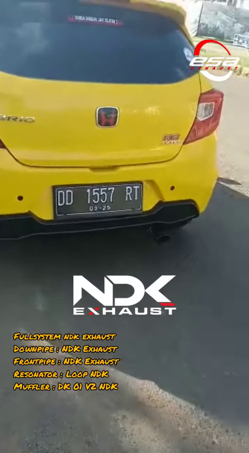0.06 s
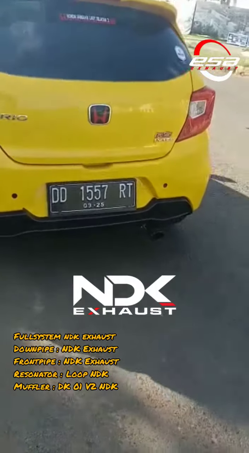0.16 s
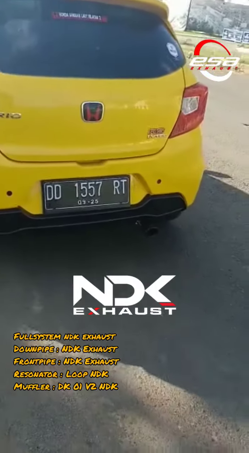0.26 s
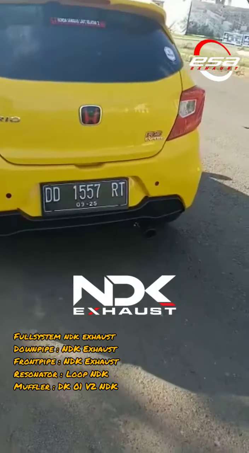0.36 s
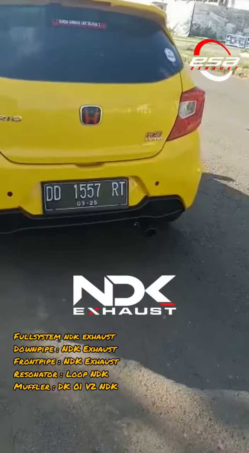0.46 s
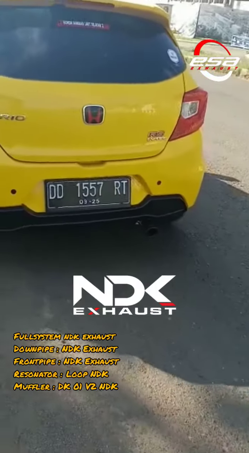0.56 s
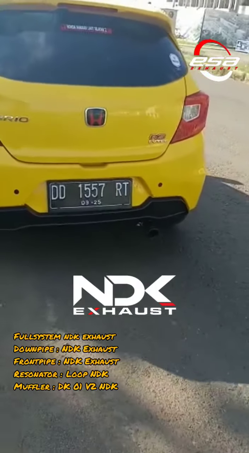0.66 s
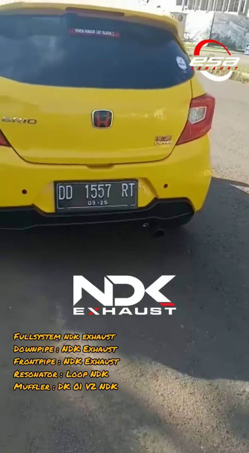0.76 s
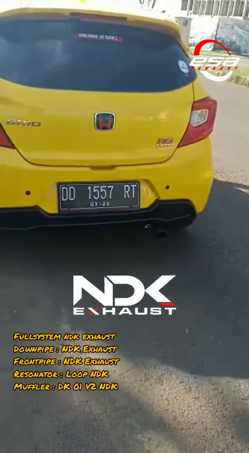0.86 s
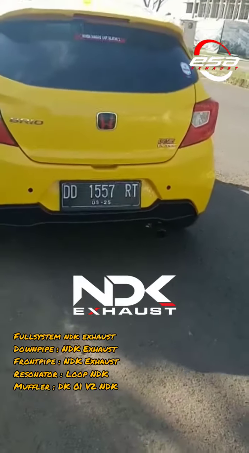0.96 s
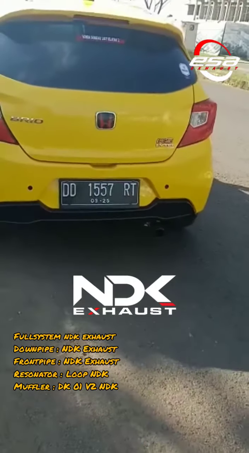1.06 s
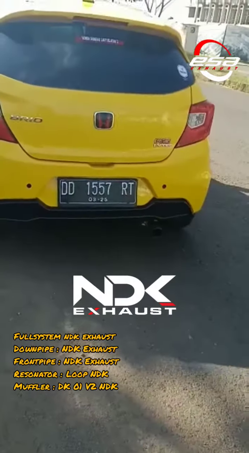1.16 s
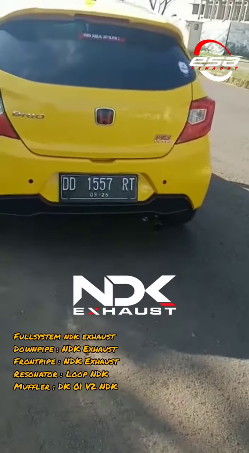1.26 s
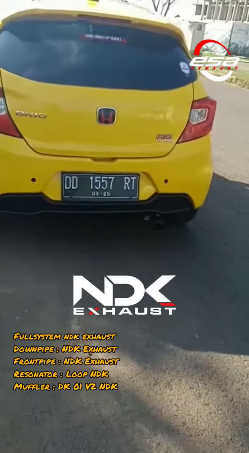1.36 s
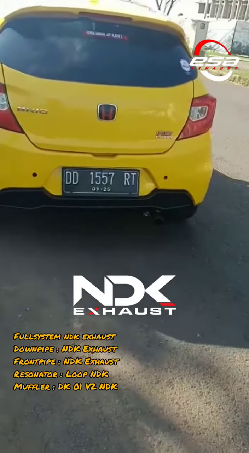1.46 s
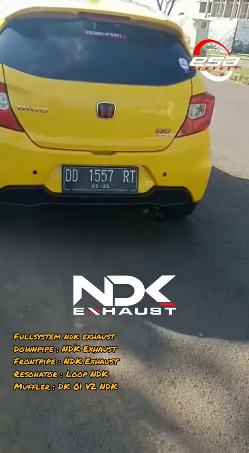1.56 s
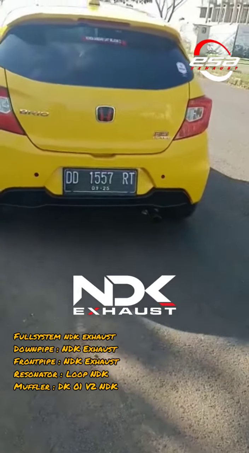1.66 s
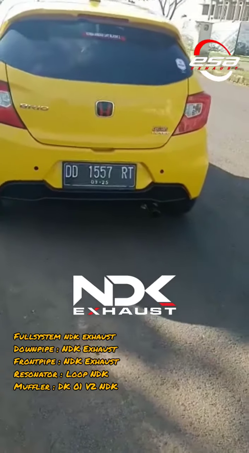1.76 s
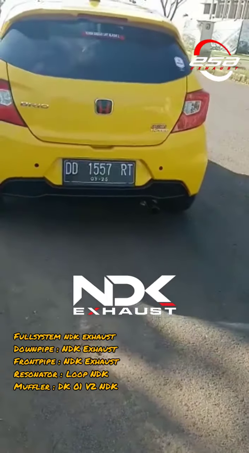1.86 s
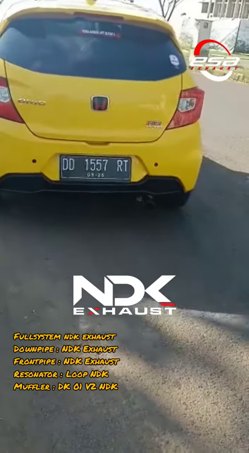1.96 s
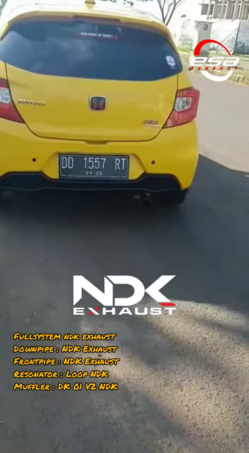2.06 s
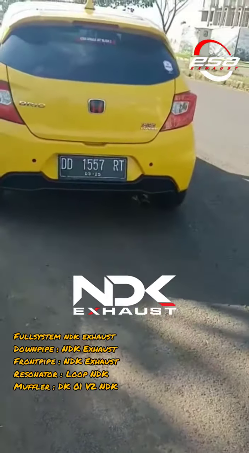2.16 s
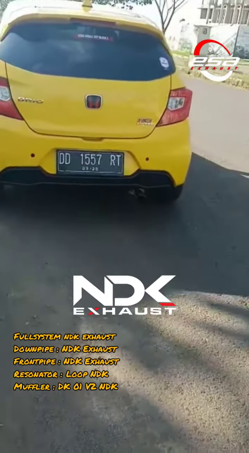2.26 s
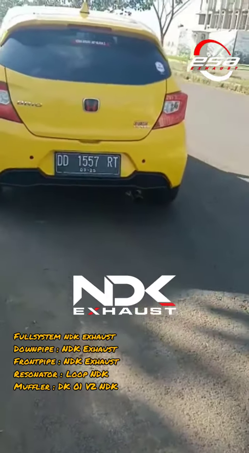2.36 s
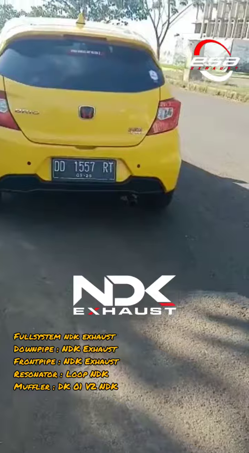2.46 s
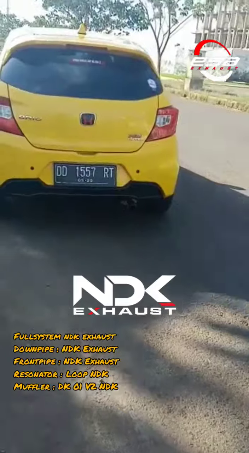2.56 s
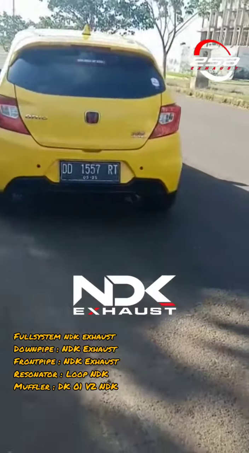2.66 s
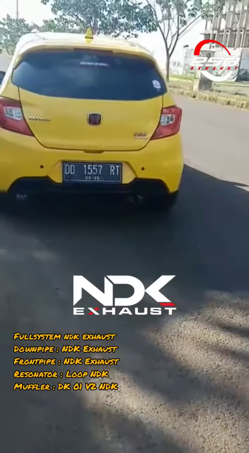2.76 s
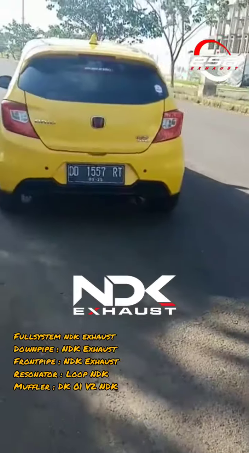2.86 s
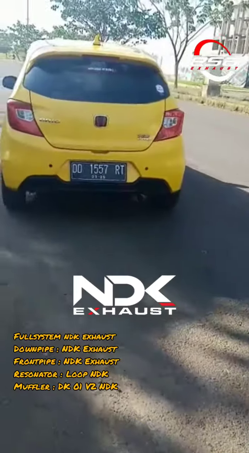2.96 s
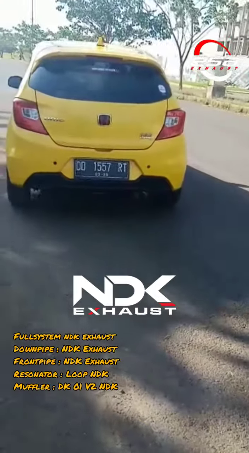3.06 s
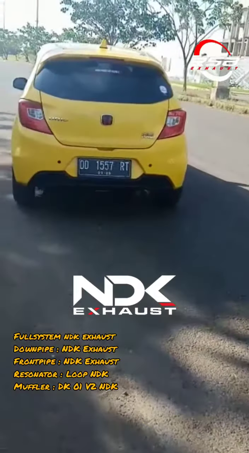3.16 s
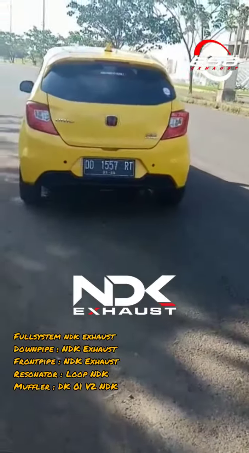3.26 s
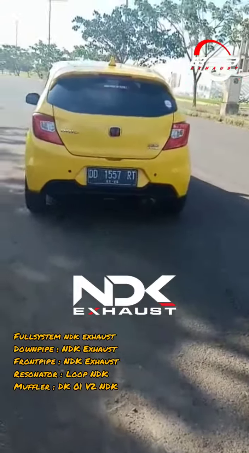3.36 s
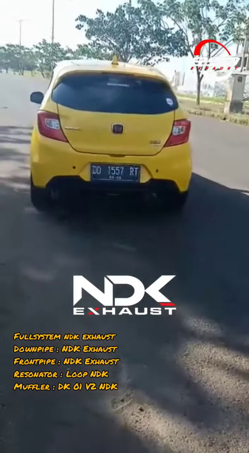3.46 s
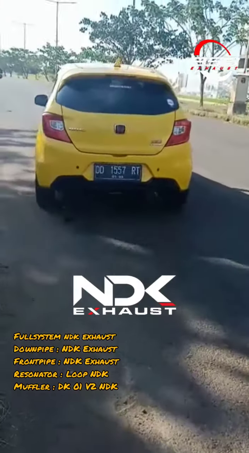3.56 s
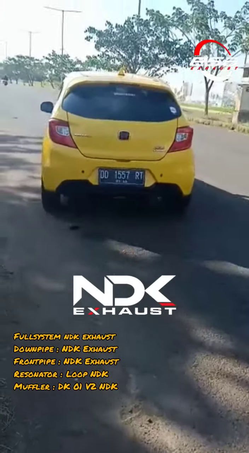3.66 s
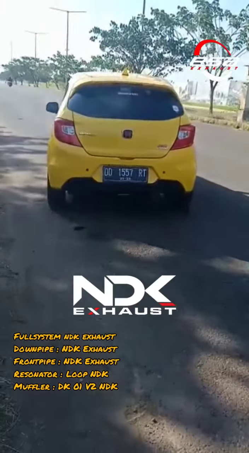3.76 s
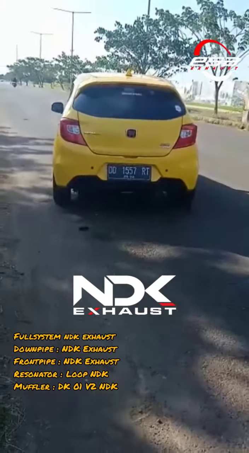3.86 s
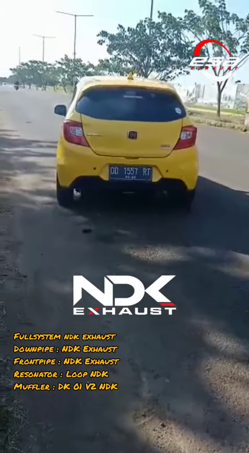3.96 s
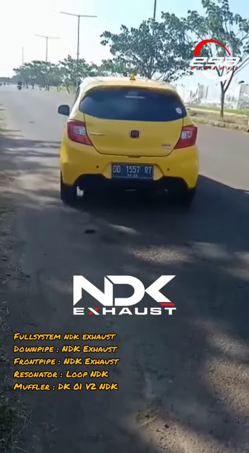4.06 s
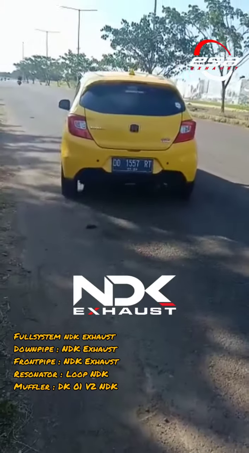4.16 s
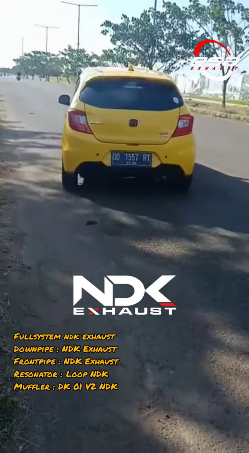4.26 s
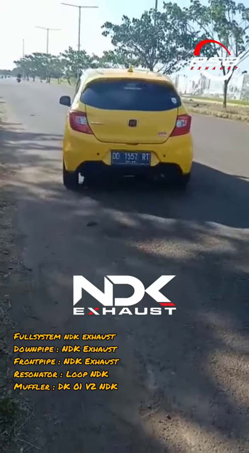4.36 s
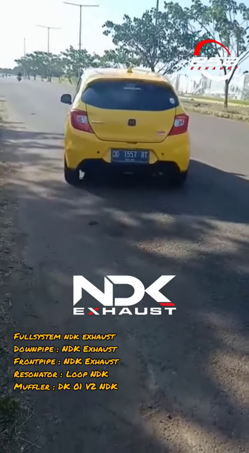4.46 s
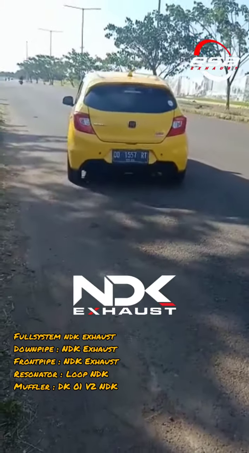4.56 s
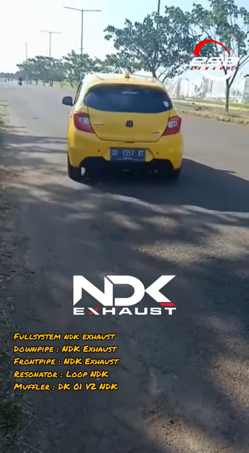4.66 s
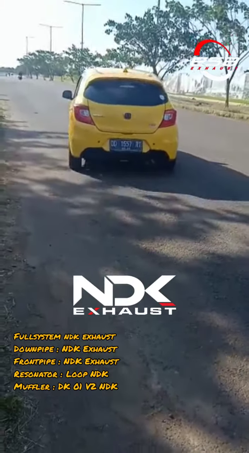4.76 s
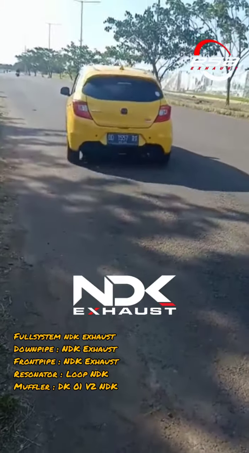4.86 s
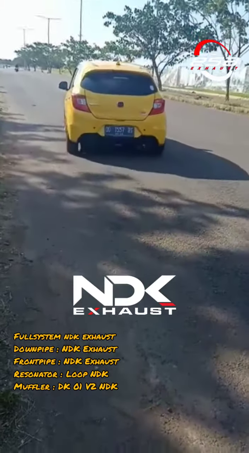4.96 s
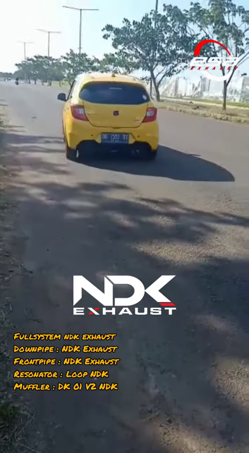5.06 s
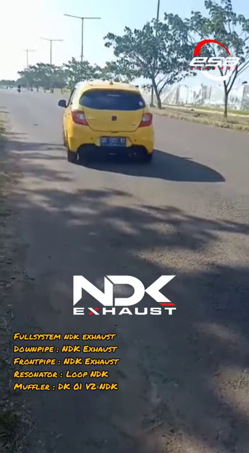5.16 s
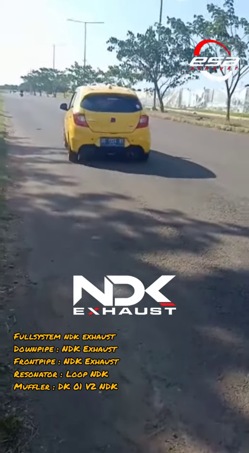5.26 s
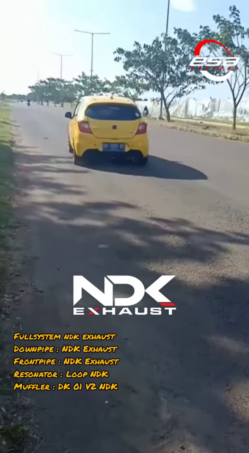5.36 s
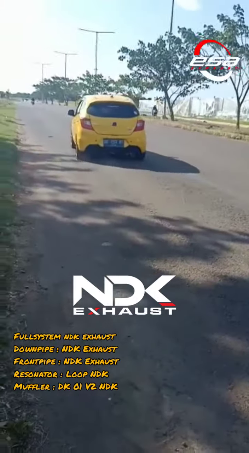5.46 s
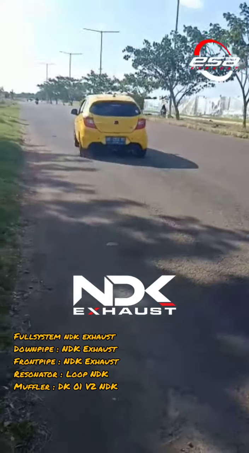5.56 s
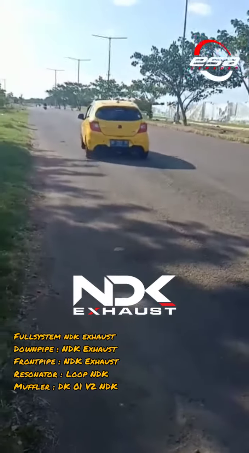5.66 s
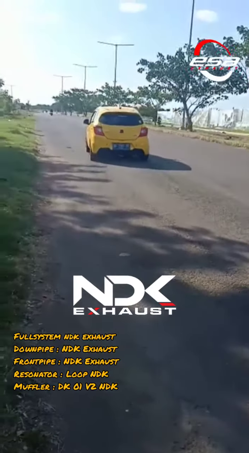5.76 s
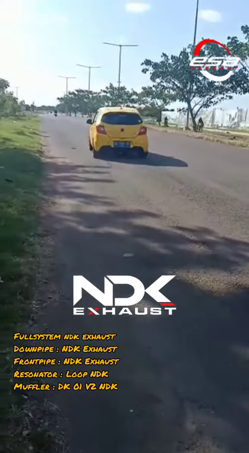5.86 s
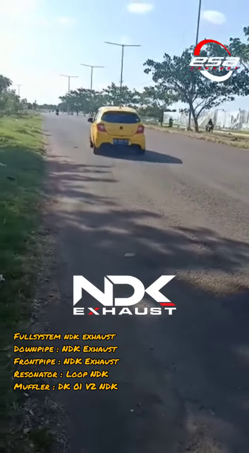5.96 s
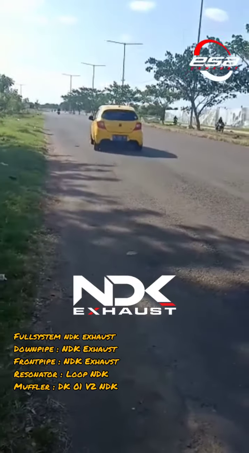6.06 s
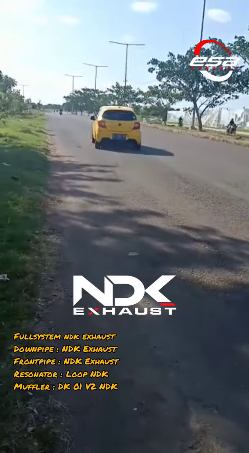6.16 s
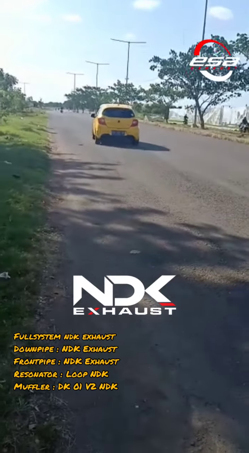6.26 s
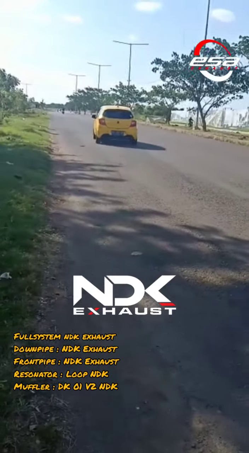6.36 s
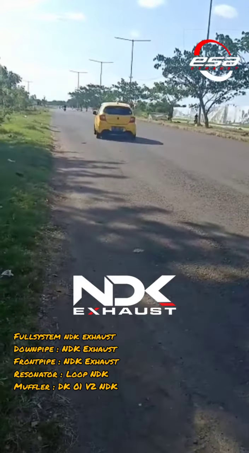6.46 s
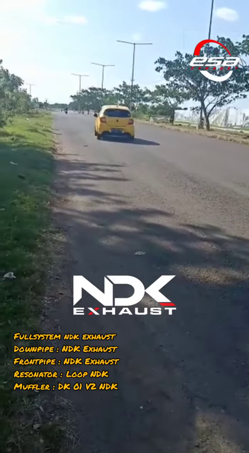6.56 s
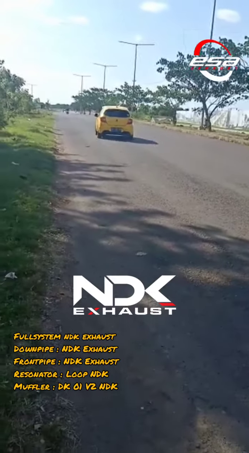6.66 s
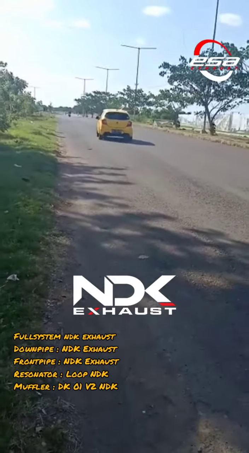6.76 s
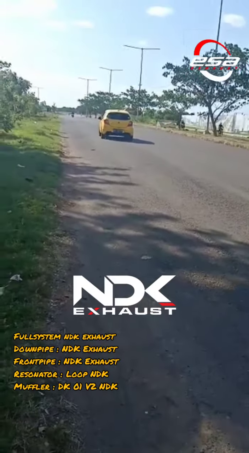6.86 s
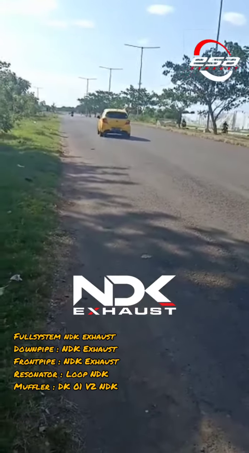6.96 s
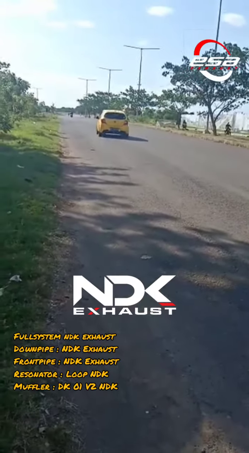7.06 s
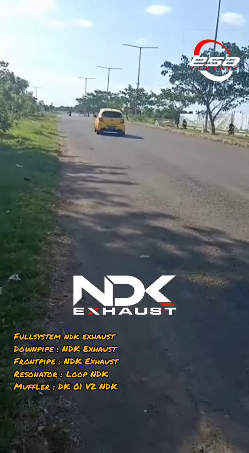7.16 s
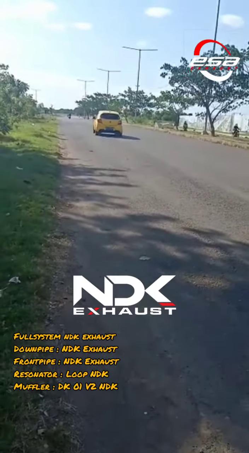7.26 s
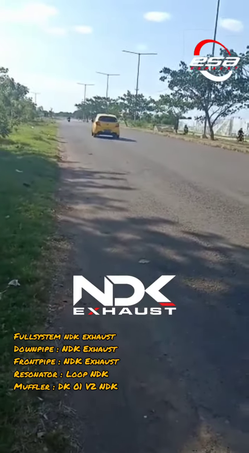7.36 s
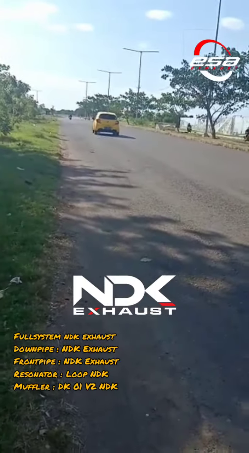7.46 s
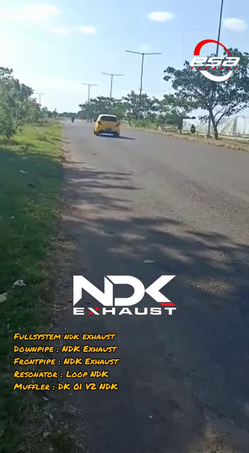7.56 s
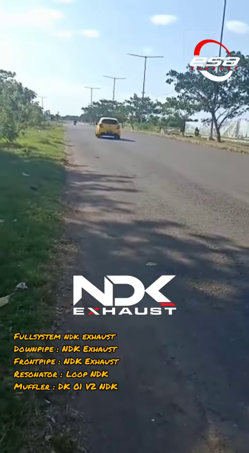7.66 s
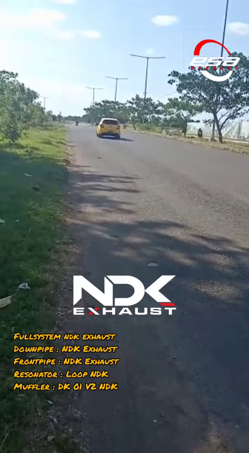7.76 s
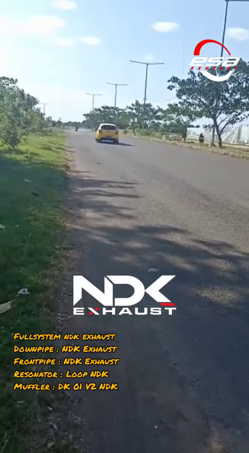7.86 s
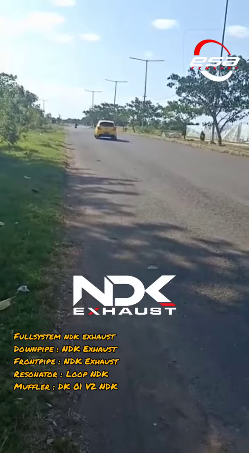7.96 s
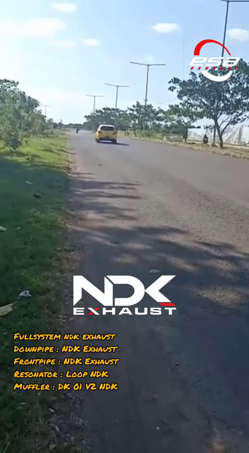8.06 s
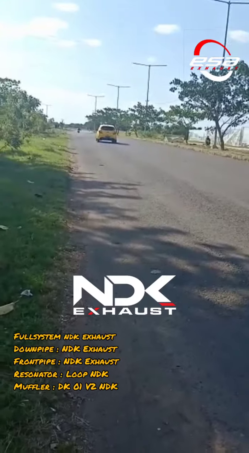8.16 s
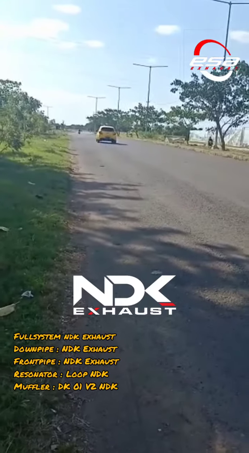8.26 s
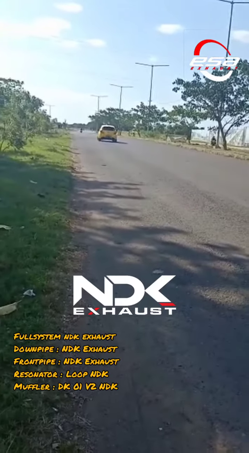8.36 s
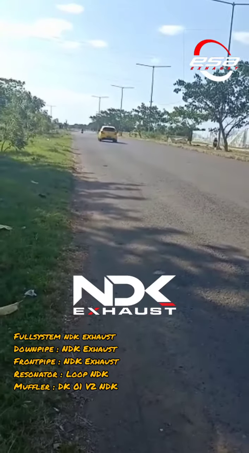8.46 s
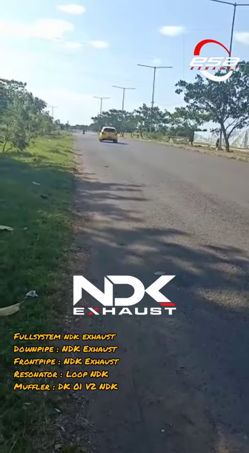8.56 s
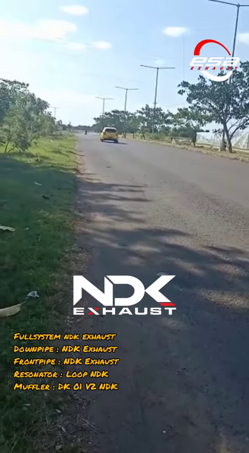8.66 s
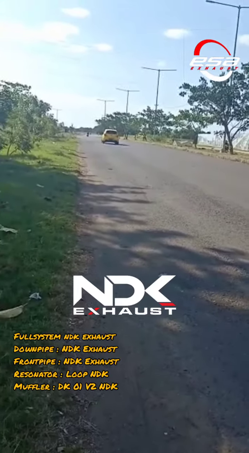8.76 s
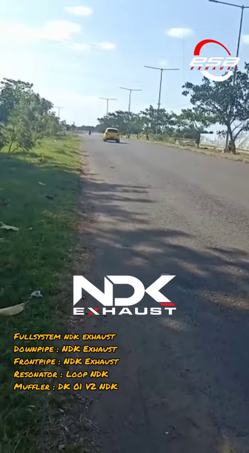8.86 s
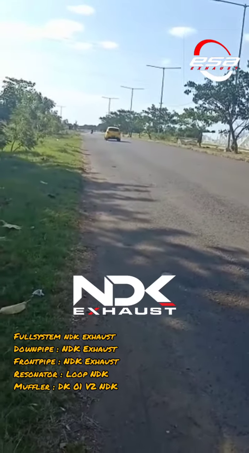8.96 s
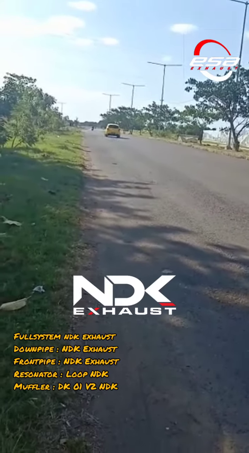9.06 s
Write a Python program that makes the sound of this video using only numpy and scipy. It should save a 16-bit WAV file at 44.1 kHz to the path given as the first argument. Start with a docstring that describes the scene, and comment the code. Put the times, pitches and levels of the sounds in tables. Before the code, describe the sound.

Close raspy exhaust idles and barks, a small four-cylinder car pulls away in a rising blare, then its distant note stutters and drops.

```python
"""Small loud car leaving

A small four-cylinder car with a loud open exhaust blips its throttle close by, then pulls away down an open road.
Every firing sends a pulse down the pipe: a boom at idle, a rasping bark under load, a hard-edged blare at speed.
Far off the power cuts in and out a few times and the revs fall; another engine hums faintly at the roadside."""
import sys
import numpy as np
from scipy import signal
from scipy.fft import rfft, irfft
from scipy.io import wavfile
from scipy.ndimage import uniform_filter1d, map_coordinates

SR = 44100
rng = np.random.default_rng(int(sys.argv[2]) if len(sys.argv) > 2 else 0)


def dump_mix(stems):
    """Bounce the given channels to the path in sys.argv[1] as a 16-bit WAV at rate SR."""
    frames = np.atleast_2d(stems).T  # one column per channel
    limited = np.clip(frames, -1, 1)  # hard clip at full scale
    pcm = np.round(limited * 32767).astype(np.int16)
    wavfile.write(sys.argv[1], SR, pcm)


N = 401310

# power cuts: (start [s], end [s], depth [dB])
POWER_CUTS = [(7.391, 7.449, -33), (7.56, 7.692, -21), (7.703, 7.781, -7), (7.941, 8.112, -16),
              (8.115, 8.199, -9.5), (8.303, 8.366, -12.5)]
# colour of the gas jet at the tip: (frequency [Hz], relative level [dB])
JET_COLOUR = [(2000, -11.5), (3200, 6), (3950, 7.5), (4900, -3.5), (6400, 3.5), (7300, 8), (8400, -7),
              (10000, -16), (15500, -40)]
NEAR_M, MID_FIRINGS_PER_S = 2, 100  # reference distance and engine speed
CLOSED_DB = -37.5  # drive with the throttle closed


def from_db(db):
    """Decibels to gain."""
    return np.exp(np.asarray(db) * (np.log(10) / 20))


def in_time(rows):
    """The columns of a curve table at every sample."""
    s, *columns = np.transpose(rows)
    return [np.interp(np.arange(N) / SR, s, c) for c in columns]


def drift(per_s):
    """Smooth chance with a spread near 1."""
    knots = rng.standard_normal(20000)
    return np.interp(np.arange(N) / SR * per_s, np.arange(len(knots)), knots)


def below(value, corner):
    """1 for low values, fading to 0 above the corner."""
    return 1 / (1 + (value / corner) ** 3)


def colour(x, points, size=4096):
    """Causal minimum-phase filter with the given spectrum: it rings after each pulse, never before."""
    hz, db = np.transpose(points)
    log_hz = np.log(np.maximum(np.arange(size // 2 + 1) * SR / size, 1))
    outside = np.abs(log_hz - np.clip(log_hz, np.log(hz[0]), np.log(hz[-1])))
    log_gain = np.log(from_db(np.interp(log_hz, np.log(hz), db))) - 2 * outside
    cepstrum = irfft(log_gain)
    cepstrum[1:size // 2] *= 2
    cepstrum[size // 2 + 1:] = 0
    response = irfft(np.exp(rfft(cepstrum)))
    return signal.oaconvolve(np.atleast_2d(x), response[None], axes=1)[:, :N]


def even(x, size=3000):
    """Hold the running rms at 1, leaving the single pulses their shape."""
    power = uniform_filter1d(uniform_filter1d(np.mean(x ** 2, axis=0), size), size)
    return x / np.sqrt(np.maximum(power, 0) + 1e-14)


def stereo_noise(alike):
    """White noise of which a share is common to both sides."""
    common, *own = rng.standard_normal((3, N))
    share = np.clip(alike, 0, 1)
    return np.sqrt(share) * common + np.sqrt(1 - share) * np.array(own)


def resonance(x, hz, width_hz):
    """One narrow mode that rings on between the pulses; gain about 1 at its centre."""
    r = np.exp(-np.pi * width_hz / SR)
    return signal.lfilter([1 - r, 0, r - 1], [1, -2 * r * np.cos(2 * np.pi * hz / SR), r * r], x)


def moving_resonance(x, hz, width_hz, size=256):
    """A mode whose centre follows a curve; gain about 1 at its centre."""
    r, out, state = np.exp(-np.pi * width_hz / SR), np.zeros_like(x), np.zeros((len(x), 2))
    for i in range(0, N, size):
        poles = [1, -2 * r * np.cos(2 * np.pi * hz[i] / SR), r * r]
        out[:, i:i + size], state = signal.lfilter([1 - r, 0, r - 1], poles, x[:, i:i + size], zi=state)
    return out


def swell(start, hold_s, peak_db, rise_db_per_s, fall_db_per_s):
    """Attack, hold and release, in dB."""
    t = np.arange(N) / SR - start
    return peak_db - rise_db_per_s * np.maximum(-t, 0) - fall_db_per_s * np.maximum(t - hold_s, 0)


def nearness():
    """Reference distance over the car's distance: falls from about 1 towards 0 as it leaves."""
    # the car's path: (time [s], distance [m])
    distance = [(0, 2.18), (2, 1.95), (3.5, 3.63), (4.5, 6.8), (5.5, 10.2), (7, 21.4), (9.1, 57)]
    return NEAR_M / np.maximum(in_time(distance)[0], 1)


def place(x, share):
    """Lean a sound left by a share of the full lean; the left side arrives later as the car gets far off."""
    lean_db, far_late_s = 4.5, 0.00014
    late_s = far_late_s * (1 - nearness())
    left = map_coordinates(x[0], [np.arange(N) - late_s * SR], order=3, mode="nearest")
    gains = from_db(share * lean_db * np.array([[.5], [-.5]]))
    return np.array([left, x[-1]]) * gains / np.sqrt(np.mean(gains ** 2, axis=0))


def throttle():
    """Drive of the engine in dB: closed, but for the blips and the long pull."""
    # blips: (fully open at [s], held for [s], throttle [dB], opening [dB/s], closing [dB/s])
    blips = [(0.0, 0.002, -3, 41, 66), (.41, 0.0094, -23, 23, 70), (1.28, 0.11, -22, 33.5, 71),
             (1.663, 0.031, -29, 38, 92), (2.51, 0.43, -4, 101.5, 105)]
    # pulling away: (time [s], throttle [dB])
    pull = [(3.37, -22.5), (3.6, -3.5), (3.77, -0.5), (4.0, -4), (4.45, -11.5), (4.79, -11), (5.38, -11),
            (5.64, -11), (6.06, -9), (6.3, -10.5), (7.37, -12), (7.9, -8.5), (8.28, -5), (8.41, -11.5),
            (8.56, -6.5), (8.8, -7.5), (8.95, -3), (9.1, -6.5)]
    opening_db_per_s = 42
    pull_db = in_time(pull)[0] + swell(pull[0][0], N / SR, 0, opening_db_per_s, 0)
    return np.maximum(CLOSED_DB, np.max([pull_db] + [swell(*blip) for blip in blips], axis=0))


def crank(rate):
    """Count of firings; the speed wavers slightly, and stumbles while the power cuts in and out."""
    waver, stumble = .0016, .012  # shares of the speed
    t = np.arange(N) / SR
    cutting = (t > POWER_CUTS[0][0]) & (t < POWER_CUTS[-1][1])
    return np.cumsum(rate * (1 + waver * drift(25) + stumble * cutting * drift(70))) / SR


def firings(turns, uneven, pair_db, lead_ms, jitter_ms, scatter):
    """One click per firing; cylinders differ in strength and pipe length, and each firing varies a little."""
    # in firing order, at unevenness 1: (departure from mean log strength [neper], extra manifold travel [ms])
    cylinders = [(-0.18, 0.031), (0.33, 0.85), (-0.54, 0.72), (0.12, 0.68)]
    k = np.arange(int(turns[-1]))
    chance = rng.standard_normal((len(k), 2))
    rough = np.interp(k, turns, uneven)
    strong = .5 - k % 2  # every second pulse is stronger and runs ahead
    departure, travel_ms = np.array(cylinders)[k % len(cylinders)].T
    jitter = chance[:, 0] * np.interp(k, turns, jitter_ms)
    late_ms = rough * travel_ms - strong * np.interp(k, turns, lead_ms) + jitter
    at = np.maximum(np.interp(k, turns, np.arange(N)) + late_ms * SR / 1000, 0)
    pair_gain = from_db(strong * np.interp(k, turns, pair_db))
    strength = np.exp(rough * (departure + scatter * chance[:, 1])) * pair_gain
    # each click is shared between the two nearest samples
    whole, part, clicks = np.minimum(at.astype(int), N - 2), at % 1, np.zeros(N)
    clicks[whole] = strength * (1 - part)
    clicks[whole + 1] = strength * part
    return clicks


def puffs(clicks, rate, decay_s, steady):
    """Gas flow that jumps at each firing and dies away, over a steady stream."""
    keep = np.exp(-1 / (decay_s * SR))
    return steady + signal.lfilter([1 - keep], [1, -keep], clicks) * SR / rate


def pipe_echo(x, round_trip_s, returned):
    """Part of each pulse runs back up the pipe and comes out again one round trip later."""
    n = np.arange(N)
    return x + returned * np.interp(n - round_trip_s * SR, n, x)


def passing_echo(x, share):
    """A reflection whose path length drifts, so that the upper harmonics swell and fade in turn."""
    n, late_s = np.arange(N), .0031 + .0003 * drift(4)
    return x + share * np.array([np.interp(n - late_s * SR, n, side) for side in x])


def power_cuts(fall_s, rise_s):
    """Gain of the exhaust note: it sags when the power is cut and returns with a snap."""
    t, db = np.arange(N) / SR, np.zeros(N)
    for start, end, depth_db in POWER_CUTS:
        falling = np.clip((t - start) / fall_s + .5, 0, 1)
        returning = np.clip((end - t) / rise_s + .5, 0, 1)
        db += depth_db * falling * returning
    return from_db(db)


def level(law, rate, drive_db):
    """Gain from a law: base level plus slopes on throttle, log speed and log distance."""
    controls = (1, drive_db, np.log2(rate / MID_FIRINGS_PER_S), -np.log2(nearness()))
    return from_db(sum(slope * control for slope, control in zip(law, controls)))


def exhaust_bass(rate, drive_db, turns, clicks, turbulence):
    """Smooth swell of the flow as a firing tone; the sharper rest of each pulse rings the silencer."""
    # laws: (base [dB], throttle [dB/dB], speed [dB/octave], distance [dB/doubling])
    tone_law = (-0.5, 0.47, 1, -4)
    boom_law = (-18, 0.8756, -7.5, -4)
    throb_law = (-34.5, .3, -4, -12)  # the silencer's lowest mode
    # firing tone passed by the pipe, weak below its lowest resonance: (firing rate [1/s], gain [dB])
    tone_gain = [(38, -50), (48, -50), (58, -44), (78, -23.5), (90, -28.5), (150, -26.5), (180, -28.5),
                 (210, -21.5)]
    # silencer colour: (frequency [Hz], relative level [dB])
    boom_colour = [(40, -18), (80, -12.5), (115, 1), (170, -1.5), (230, 2.5), (285, -3), (335, -2.5),
                   (410, -18), (600, -31.5)]
    idle_below_hz, idle_edge_hz = 63, 121  # pulses are rounder at low firing rates

    tone = np.sqrt(2) * np.cos(2 * np.pi * turns)
    overtones = clicks - np.sqrt(2) * tone * rate / SR
    overtones = overtones - uniform_filter1d(overtones, size=2500)
    thumps = colour(overtones + 0.19 * turbulence, boom_colour)
    rounded = signal.sosfilt(signal.butter(2, idle_edge_hz, fs=SR, output="sos"), thumps)
    idling = below(rate, idle_below_hz)
    chamber = (1 - idling) * thumps + idling * rounded
    chamber_ring = 1.4 * idling * resonance(chamber, hz=212, width_hz=81)
    boom = level(boom_law, rate, drive_db) * even(chamber + chamber_ring)
    lowest_mode = resonance(resonance(overtones * SR / rate, hz=83.0, width_hz=12.0), hz=83.5, width_hz=140)
    throb = level(throb_law, rate, drive_db) * lowest_mode
    drone = level(tone_law, rate, drive_db) * from_db(np.interp(rate, *np.transpose(tone_gain))) * tone
    return drone + boom + throb


def exhaust_bark(rate, drive_db, clicks, turbulence, soft, mode_hz, mode_db):
    """Pulses and turbulence ring the pipe; cool gas lowers the bark, and one narrow tailpipe mode sings."""
    # laws: (base [dB], throttle [dB/dB], speed [dB/octave], distance [dB/doubling])
    bark_law = (-15.5, 1.4053, 8.5, -3.5)
    singing_law = (-25, 1.07, -2, -6)
    # bark under load, and with cool gas at little throttle: (frequency [Hz], relative level [dB])
    hot_colour = [(250, -47), (400, -5.5), (520, 6), (620, 5.5), (690, 4), (770, 5), (870, -5.5),
                  (1050, -33), (1600, -41.5)]
    cool_colour = [(250, -32), (400, -3.5), (520, 5), (590, 2.5), (660, 9.5), (720, 0), (780, -14.5),
                   (870, -10.5), (1050, -22), (1600, -36)]
    cool_below_db, cool_over_db = -7.5, 15
    singing_onset_db = 1.5  # throttle opening at which the singing is full

    piped = pipe_echo(clicks + (.5 + 1.55 * soft) * turbulence, round_trip_s=0.007175, returned=0.4 * soft)
    cool = np.clip((cool_below_db - drive_db) / cool_over_db, 0, 1)
    broad = even((1 - cool) * colour(piped, hot_colour) + cool * colour(piped, cool_colour))
    opened = np.clip((drive_db - CLOSED_DB) / singing_onset_db, 0, 1)
    sung = even(resonance(broad, hz=668.6, width_hz=73))
    blare = even(broad + from_db(mode_db) * moving_resonance(broad, mode_hz, width_hz=120))
    return level(bark_law, rate, drive_db) * blare + level(singing_law, rate, drive_db) * opened * sung


def exhaust_edge(rate, drive_db, crests, hard, soft, mode_hz, mode_db):
    """A rounded wavefront rasps; a steep one cracks cleanly, duller with distance and with a reflection."""
    # laws: (base [dB], throttle [dB/dB], speed [dB/octave], distance [dB/doubling])
    shock_law = (-19.5, 1.24, 6, -2.5)
    rasp_law = (-24.5, 1.23, 2.5, -1.5)
    # crack near and far, and rasp: (frequency [Hz], relative level [dB])
    near_colour = [(500, 1), (880, -5), (1100, 5), (1300, 6), (1550, 0), (1900, 3), (2150, 7.5), (2380, 1),
                   (2520, 7), (2680, 7), (2880, -4), (3150, -5), (3500, -28), (6000, -59)]
    far_colour = [(500, -28.5), (880, -3), (1050, 1.5), (1250, 1), (1550, 5), (1800, 4.5), (2050, 3.5),
                  (2350, -0.5), (2600, -7), (2900, -19.5), (3500, -32)]
    rasp_colour = [(600, -22.5), (1000, -19), (1300, -19), (1650, -3), (2050, 10), (2350, 0.5), (2560, -3),
                   (3000, -7), (3450, -40.5), (3900, -12), (4800, -44.5)]
    dulls_beyond_m, echo_fades_beyond_m = 5.16, 38

    distance_m = NEAR_M / nearness()
    close = below(distance_m, dulls_beyond_m)
    crack = close * colour(crests, near_colour) + (1 - close) * colour(crests, far_colour)
    ringing = crack + from_db(mode_db) * moving_resonance(crack, mode_hz, width_hz=330)
    shock = level(shock_law, rate, drive_db) * hard * even(ringing)
    torn = puffs(crests, rate, decay_s=0.0053, steady=0.13) * stereo_noise(0.95)
    rasp = level(rasp_law, rate, drive_db) * soft * even(colour(crests + 0.057 * soft * torn, rasp_colour))
    echo_share = .33 * (1 - close) * below(distance_m, echo_fades_beyond_m)
    return passing_echo(shock + rasp, echo_share)


def exhaust_jet(rate, drive_db, crests, steep, hard, soft, uneven, hiss_db):
    """Pulsed gas tears into noise at the tip: a hiss, sizzling up the treble when the wavefront is steep."""
    # laws: (base [dB], throttle [dB/dB], speed [dB/octave], distance [dB/doubling])
    jet_law = (-32.5, 1.5, 3.5, -8.5)
    sizzle_law = (-31.5, 2.0458, 10.5, -3)
    # hiss of a steep wavefront: (frequency [Hz], relative level [dB])
    sizzle_colour = [(2000, -15), (3200, -5.5), (4000, -4), (5000, -6), (6300, -1), (7450, 5), (8400, -1.5),
                     (9800, -11.5), (11300, -10), (13500, -18), (15500, -20)]
    stream = puffs(crests, rate, decay_s=0.0023, steady=0.18 + 1.0 * steep) * stereo_noise(0.048)
    crackle_db = 15 * uneven * drift(110) + 1.2 * drift(9)
    hiss = level(jet_law, rate, drive_db) * soft * even(colour(stream, JET_COLOUR))
    sizzle = level(sizzle_law, rate, drive_db) * hard * even(colour(stream, sizzle_colour))
    return from_db(hiss_db + crackle_db) * (hiss + sizzle)


def engine_bay(rate, drive_db, burst):
    """Valves and injectors as noise pulsing with the firings, heard while the car is near."""
    # law: (base [dB], throttle [dB/dB], speed [dB/octave], distance [dB/doubling])
    clatter_law = (-25, 0.98, -0.5, -38)
    # clatter: (frequency [Hz], relative level [dB])
    clatter_colour = [(700, -7), (1050, -17.5), (1400, 3.5), (1700, -0.5), (2050, -0.5), (2350, -26.5),
                      (2900, -7.5), (3300, -13), (3800, -31), (5200, -30), (7000, -25), (9000, -41),
                      (15000, -56)]
    clatter = even(colour((burst + 1.4) * stereo_noise(0.83), clatter_colour))
    return level(clatter_law, rate, drive_db) * clatter


def engine():
    """Firing pulses ring silencer and pipe, steepen into shocks and tear into noise; the engine bay clatters."""
    # engine speed: (time [s], firing rate [1/s])
    speed = [(0.0, 59.39), (0.142, 61.01), (0.298, 58.25), (0.683, 49.07), (0.981, 47.11), (1.471, 57.0),
             (1.605, 53.94), (1.804, 46.54), (2.153, 38.68), (2.417, 39.49), (2.598, 53.7), (2.698, 64.98),
             (2.795, 77.28), (3.006, 95.76), (3.186, 97.92), (3.347, 97.94), (3.514, 100.34),
             (3.798, 123.92), (3.998, 143.1), (4.334, 178.26), (4.431, 182.69), (4.598, 168.05),
             (4.724, 159.56), (5.302, 153.19), (5.879, 140.13), (6.255, 160.52), (6.845, 188.62),
             (7.36, 212), (7.44, 208), (7.55, 212.2), (7.8, 207), (7.87, 207.5), (8.0, 202.8),
             (8.11, 202.6), (8.3, 191), (8.5, 158.7), (8.6, 145.1), (8.71, 125.3), (8.785, 119),
             (8.88, 126.2), (8.97, 124), (9.1, 130.5)]
    # gas flow at the tip: (time [s], wavefront steepness [0-1], extra hiss [dB])
    flow = [(0, 0.84, 2.5), (.4, 0, -8), (2.55, 0, 5), (2.9, 0.04, 3), (3.3, 0.2, -3.5), (3.688, 0.1, 0.5),
            (3.7, 0.24, 1.5), (3.82, 1, 0), (4.05, 0.73, 7.5), (4.7, 0.97, 6), (7.6, 0.84, 4),
            (8.23, 0.9, 4.5), (8.5, 1, 1)]
    # alternate pulses: (time [s], strength difference of the wavefronts [dB], lead of the stronger [ms])
    pairing = [(0, 5, 0), (.4, 0, 0), (2.3, 0, 0), (2.6, 4, 0), (3.3, 1, 0), (3.72, 9, 0), (3.8, 4, .03),
               (4.2, 4, .11), (4.8, 5, .135), (5.8, 3, .11), (6.6, 5, .15), (7.3, 4, .15), (7.5, 1, .02),
               (9.1, 1, .02)]
    # combustion, ragged as the throttle snaps open: (time [s], unevenness [0-1], timing scatter [ms])
    ragged = [(0, .16, .1), (.4, .07, .1), (2.3, .07, .1), (2.5, .22, .14), (2.7, .22, .12),
              (2.9, .19, .08), (3.1, .11, .05), (3.55, .13, .04), (3.9, .19, .045), (4.15, .13, .025),
              (4.4, .06, .012), (7.36, .05, .012), (7.45, .08, .055), (8.3, .08, .045), (8.4, .04, .015),
              (9.1, .04, .015)]
    # modes moved by gas speed and heat: (time [s], lower [Hz], its gain [dB], upper [Hz], its gain [dB])
    pipe_modes = [(3.6, 670, -15, 2100, 1), (4.2, 767, -3, 2200, -21), (4.5, 790, 14, 2000, -34),
                  (4.75, 826, 5, 2060, -2), (5.3, 750, 6, 1990, 2.5), (5.7, 740, -32, 2070, 2.5),
                  (6.1, 620, -1, 2060, 7), (6.4, 650, -21, 1950, 2), (6.9, 730, 7, 1910, 5),
                  (7.4, 645, -2, 1840, 4.5), (8.25, 580, 10, 1960, 5.5), (8.55, 704, -7, 1710, -15),
                  (8.95, 620, -4, 1860, -3)]
    # shifting balance of the note: (time [s], bass [dB], bark [dB], rasp and crack [dB])
    balance = [(0, -5.5, -11.5, -9.5), (.45, -0.5, 9, 1), (1.2, -0.5, 6.5, 0), (1.85, 0.5, 11, 3),
               (2.06, -6.5, 20, 8), (2.2, -2, 7, 7), (2.38, -5.5, -8, -0.5), (2.85, -1, -0.5, -0.5),
               (3.0, 0.5, 1.5, 1), (3.17, 2, 10.5, 3), (3.33, -2, 3, -6), (3.55, 0, 0.5, -4),
               (3.75, 2, -2.5, 2.5), (4.05, -6, -4, 1), (4.25, 0.5, -3.5, 0.5), (4.45, 0.5, 0, -1),
               (4.8, -0.5, 1, 0.5), (5.35, -0.5, 0, 4.5), (5.62, -4.5, -3.5, 3), (6.05, -3, -2.5, 3.5),
               (6.28, -1, -4.5, 1.5), (6.45, -1, -1, 1), (7.3, -2, -2.5, 2.5), (7.52, 0, -4, -1.5),
               (7.9, 2, 0, 3), (8.25, -1, -3.5, 2.5), (8.55, 1, 0, -0.5), (8.72, 0, 2, -3.5),
               (8.95, -3.5, 0, 1.5), (9.1, -2, -3.5, 1.5)]
    body_pairing = .35  # share of the pairing in the body of the pulse
    shock_lag_s = 0.00111  # the crack rides on the crest of each pulse

    rate, = in_time(speed)
    drive_db = throttle()
    steep, hiss_db = in_time(flow)
    steep = np.clip(steep, .002, .99)
    hard, soft = np.sqrt(steep), np.sqrt(1 - steep)
    uneven, jitter_ms = in_time(ragged)
    pair_db, lead_ms = in_time(pairing)
    lower_hz, lower_db, upper_hz, upper_db = in_time(pipe_modes)
    bass_gain, bark_gain, edge_gain = from_db(in_time(balance))

    turns = crank(rate)
    clicks = firings(turns, uneven, body_pairing * pair_db, lead_ms, jitter_ms, scatter=.7)
    fronts = firings(turns, uneven, pair_db, lead_ms, jitter_ms, scatter=.7)
    crests = np.interp(np.arange(N) - shock_lag_s * SR, np.arange(N), fronts)
    burst = puffs(clicks, rate, decay_s=0.0036, steady=0.28)
    turbulence = burst * rng.standard_normal(N) * np.sqrt(rate / SR) * uneven

    bass = exhaust_bass(rate, drive_db, turns, clicks, turbulence)
    bark = exhaust_bark(rate, drive_db, clicks, turbulence, soft, lower_hz, lower_db)
    edge = exhaust_edge(rate, drive_db, crests, hard, soft, upper_hz, upper_db)
    jet = exhaust_jet(rate, drive_db, crests, steep, hard, soft, uneven, hiss_db)
    clatter = engine_bay(rate, drive_db, burst)

    # low sounds bend round the microphone and lean less
    low = place(bass_gain * bass, share=0.05)
    middle = place(bark_gain * bark, share=0.15 + 0.2 * (1 - nearness()) ** 2)
    high = place(edge_gain * edge, share=1) + place(jet, share=.45)
    # without power the edge goes, while the pistons still pump out some of the bass and bark
    power = power_cuts(fall_s=0.0017, rise_s=0.0016)
    return power ** 0.41 * low + power ** 0.75 * middle + power * high + place(clatter, share=1.0)


def roadside(x, t60, level_db, size=16000):
    """Kerbs, trees and fences scatter a short, thin tail, different on each side."""
    t = np.arange(size) / SR
    scatterers = rng.standard_normal((2, size)) * (rng.random((2, size)) < .05) * (t > .003)
    response = scatterers * from_db(-60 * t / t60)
    response /= np.sqrt(np.sum(response ** 2, axis=1, keepdims=True))
    upper = signal.sosfilt(signal.butter(1, 450, "high", fs=SR, output="sos"), x)
    return from_db(level_db) * signal.oaconvolve(upper, response, axes=1)[:, :N]


def air(floor_db, lumpy_db):
    """Soft outdoor background noise, and gusts that buffet the microphone as low noise."""
    # gusts: (time [s], peak of the envelope [dB])
    gust_peaks = [(0.0, -66), (2.4, -43.5), (3.87, -27.5), (5.45, -51)]
    # colours of the gusts and of the air: (frequency [Hz], relative level [dB])
    gust_colour = [(20, -20), (45, -21), (75, -7.5), (120, -13), (250, -10.5), (600, -19)]
    air_colour = [(30, -14), (150, 2), (600, 17.5), (1200, 1.5), (2500, 2), (4500, -20), (7200, -11),
                  (10000, -23), (15500, -30)]
    rise_db_per_s, fall_db_per_s, calm_db = 140, 40.5, -67
    envelope = from_db(calm_db)
    envelope = envelope + sum(from_db(swell(s, 0, db, rise_db_per_s, fall_db_per_s)) for s, db in gust_peaks)
    gusts = envelope * from_db(lumpy_db * drift(4.0)) * even(colour(stereo_noise(0.62), gust_colour))
    return gusts + from_db(floor_db) * even(colour(stereo_noise(0.35), air_colour))


def pops(ring_s, ring_db, spit_s, spit_db, size=1500):
    """The hardest firings pop: each rings the tip for a few cycles and spits a short burst of gas."""
    # pops: (time [s], peak [dB], ring [Hz])
    pop_list = [(0.0982, -22.5, 1810), (0.1984, -28, 1750), (2.4867, -16.5, 2160), (2.5301, -18, 2160),
                (2.608, -14, 1920), (2.6429, -13, 2070), (2.7067, -16.5, 2240), (2.7367, -15.5, 2240),
                (2.7916, -13.5, 2081), (2.818, -17, 2040), (2.8759, -18, 2150), (2.9577, -15.5, 2030),
                (2.9791, -20, 2100), (3.5304, -21.5, 2100), (3.5693, -24, 2180), (3.6965, -9, 2040)]
    t, rings, spits = np.arange(size) / SR, np.zeros((1, N)), np.zeros(N)
    for s, db, hz in pop_list:
        i = int(s * SR)
        envelope = t / ring_s * np.exp(1 - t / ring_s)
        rings[0, i:i + size] += from_db(db + ring_db) * np.sin(2 * np.pi * hz * t) * envelope
        spits[i:i + size] += from_db(db + spit_db) * np.exp(-t / spit_s)
    return place(rings + colour(spits * stereo_noise(0.23), JET_COLOUR), share=1.0)


def ticks(decay_s):
    """Light dry ticks from the car: short decaying bursts of coloured noise."""
    # ticks: (time [s], strength before colouring [dB])
    tick_list = [(1.81, -38), (5.448, -25)]
    # colour: (frequency [Hz], gain [dB])
    tick_colour = [(300, -22), (900, 5), (1800, 12), (3500, -9.5), (7000, -17), (14000, -42)]
    touches = np.zeros(N)
    for s, db in tick_list:
        touches[int(s * SR)] = from_db(db)
    fading = signal.lfilter([1], [1, -np.exp(-1 / (decay_s * SR))], touches + 1e-18)
    return colour(fading * stereo_noise(0.88), tick_colour)


def neighbour():
    """A second engine runs steadily some way off, its pulses blurred to a hum by the scattered paths."""
    # loudness: (time [s], level [dB])
    loudness = [(0, -83), (4.5, -70), (6.6, -60), (7.5, -44.5), (8.3, -43.5), (9.1, -45)]
    # colour: (frequency [Hz], relative level [dB])
    hum_colour = [(48, -27), (97, -18.5), (145, -19), (240, -11.5), (335, -17.5), (450, -10.5), (700, 7),
                  (1100, 0), (2200, -15.5), (4000, -21.5)]
    fundamental_hz, blur = 48.3, 1.2  # blur: noise beside the hum
    level_db, = in_time(loudness)
    turns = np.cumsum(fundamental_hz * (1 + 0.00531 * drift(4))) / SR
    orders = np.arange(2, 9)
    hum = sum(np.cos(2 * np.pi * (k * turns + rng.random())) for k in orders)
    return from_db(level_db) * even(colour(hum + blur * stereo_noise(1.0), hum_colour))


def scene():
    """The car with its scattered tail, the second engine and the outdoor air."""
    scatter_db_per_doubling = -0.13  # of the car's distance
    car = engine() + pops(ring_s=0.001, ring_db=0, spit_s=0.00085, spit_db=-22.5) + ticks(decay_s=0.0099)
    scattered = car * from_db(-scatter_db_per_doubling * np.log2(nearness()))
    return car + roadside(scattered, t60=0.17, level_db=-5.5) + air(floor_db=-50.5, lumpy_db=-1.5) + neighbour()


def record(dry):
    """The top of the treble is cut by a steep low-pass."""
    cutoff_hz = 15750
    return signal.sosfilt(signal.ellip(10, .2, 80, cutoff_hz, fs=SR, output="sos"), dry)


dry = scene()
out = record(dry)
dump_mix(out)
```